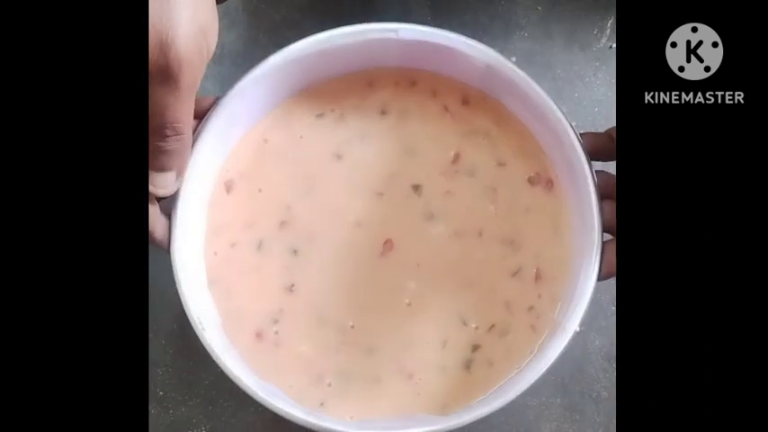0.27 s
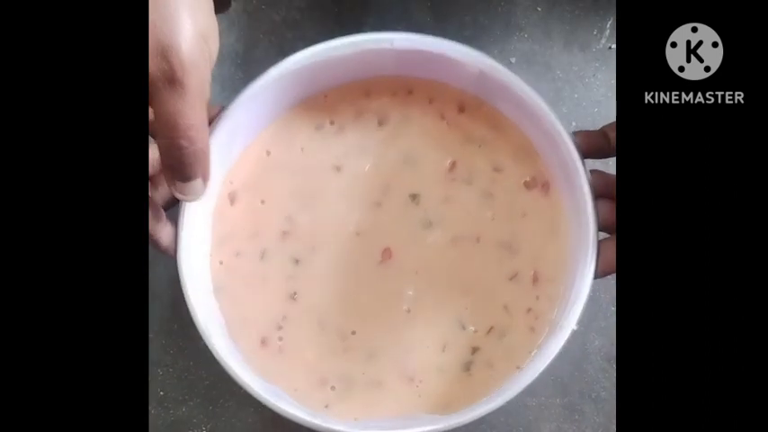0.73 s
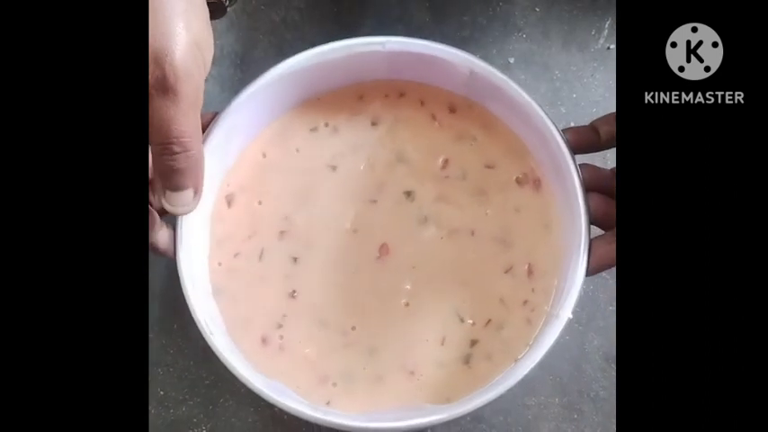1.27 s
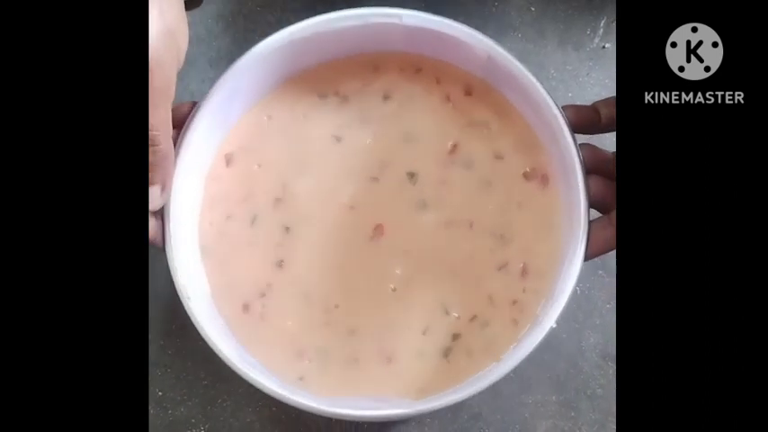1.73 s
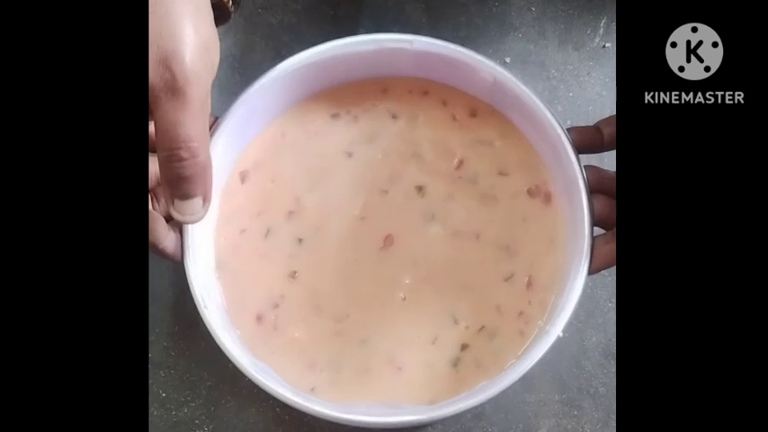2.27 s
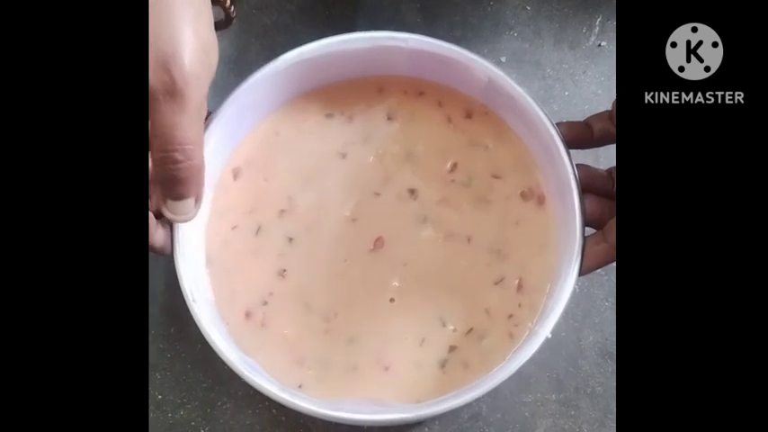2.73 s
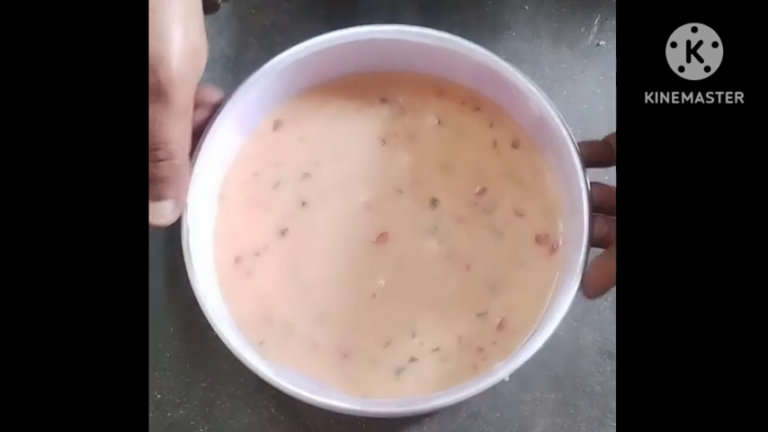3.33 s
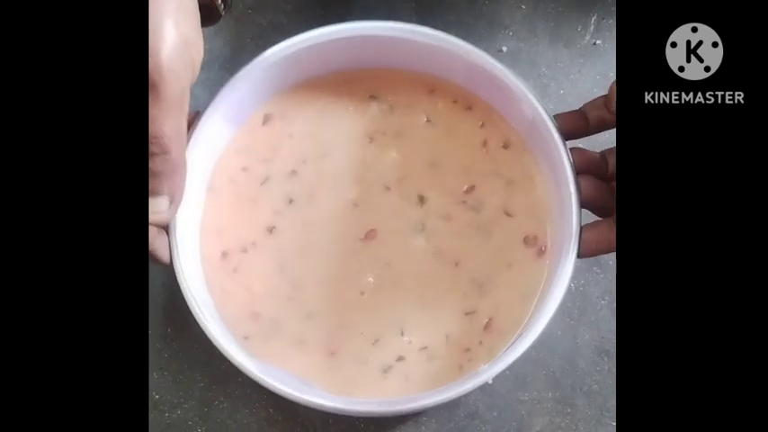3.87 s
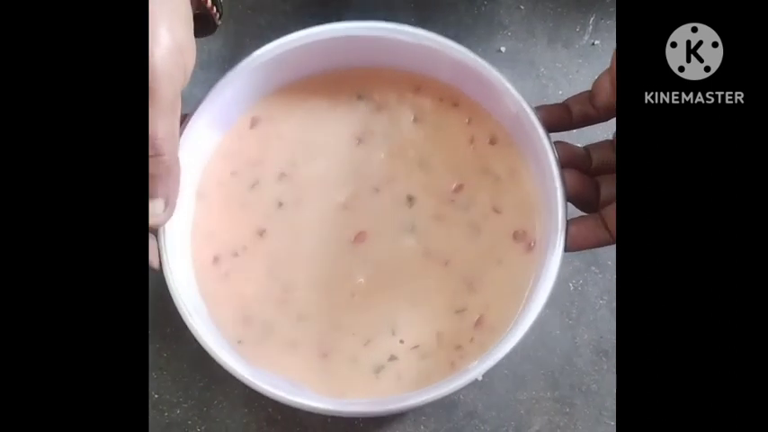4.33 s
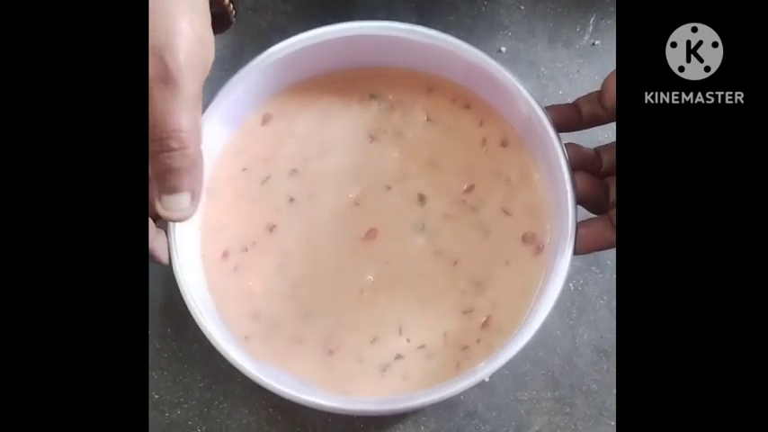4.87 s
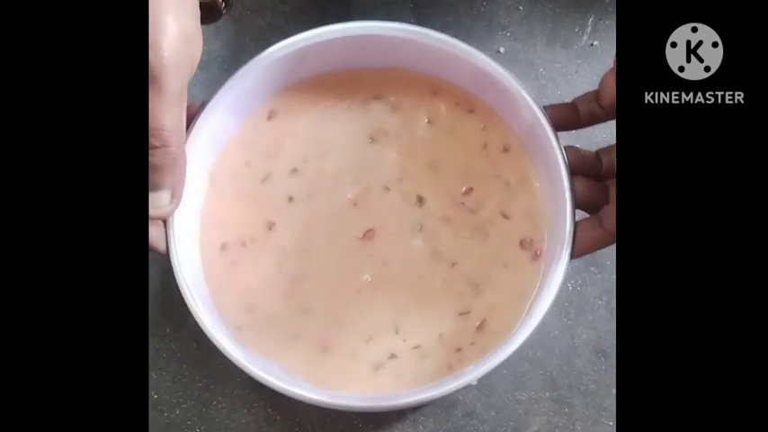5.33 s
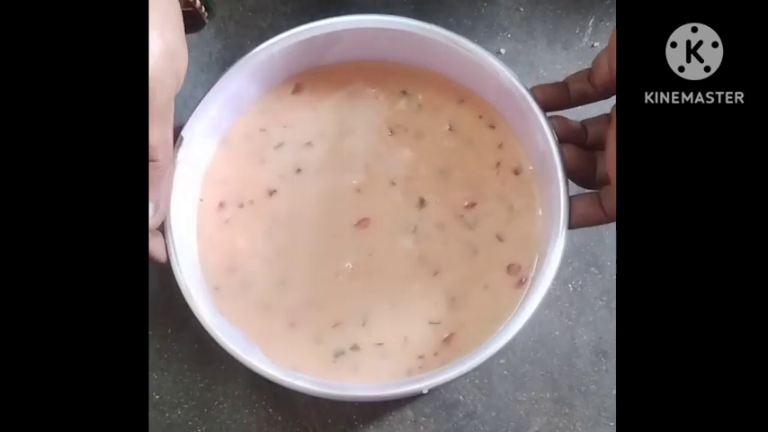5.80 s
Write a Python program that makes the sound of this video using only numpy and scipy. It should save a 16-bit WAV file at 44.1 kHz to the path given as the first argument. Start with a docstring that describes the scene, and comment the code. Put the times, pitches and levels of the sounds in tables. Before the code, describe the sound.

In a quiet, bare kitchen, a batter-filled metal tin hits a stone counter over and over, close to the microphone. It lands tilted, so each knock is a tight, dull double clack with a rim click and a short ring from the room. The knocks start loosely spaced, speed up to about four a second past the middle, and end with two slower ones. Fingers faintly brush the tin over a soft low hum.

```python
"""A bare kitchen: a round metal cake tin full of batter is knocked on a stone counter, again and again.
It lands tilted: one edge strikes, then the other. The batter deadens the metal to a short clack,
the rim clicks on the stone, the base hums briefly and the room rings on. Fingers brush the tin.
Behind it lie quiet air and a low hum; a faint whine fades under the first knocks, and a faint
drone and hiss come and go."""
import sys
import numpy as np
from scipy import signal
from scipy.fft import rfft, irfft, next_fast_len
from scipy.io import wavfile

SR = 44100
rng = np.random.default_rng(int(sys.argv[2]) if len(sys.argv) > 2 else 0)


def wav_record(signal):
    """Record a signal, one row per channel, as 16-bit PCM in the file named by sys.argv[1]."""
    frames = np.transpose(np.atleast_2d(signal))
    bounded = np.clip(frames, -1, 1)
    # unit amplitude maps onto the largest positive 16-bit level
    quanta = np.round(bounded * 32767).astype(np.int16)
    wavfile.write(sys.argv[1], SR, quanta)


N = 268172
TIME_S = np.arange(N) / SR
HZ = np.fft.rfftfreq(SR, 1 / SR)


def amp(db):
    """Decibels to gain."""
    return 10 ** (np.asarray(db) / 20)


def unit_rms(x):
    """x at rms 1."""
    return x / np.sqrt(np.mean(x ** 2) + 1e-20)


def curve(points, hz):
    """Interpolate (freq_hz, value) rows on a log axis."""
    freq_hz, values = np.transpose(points)
    return np.interp(np.log(hz + 1), np.log(freq_hz + 1), values)


def filtered(x, response):
    """x through a frequency response."""
    size = next_fast_len(N + SR // 2)
    return irfft(rfft(x, size) * response(np.fft.rfftfreq(size, 1 / SR)), size)[..., :N]


def resonance(hz, centre_hz, width_hz):
    """Causal resonator, gain 1 at centre."""
    return 1j * hz * width_hz / (centre_hz ** 2 - hz ** 2 + 1j * hz * width_hz)


def noise(response):
    """Shaped stereo noise, rms 1."""
    return unit_rms(filtered(rng.standard_normal((2, N)), response))


def band_noise(centre_hz, width_hz):
    """Narrow stereo noise, rms 1."""
    return noise(lambda hz: resonance(hz, centre_hz, width_hz) ** 2)


def swells(rows):
    """Envelope of one Gaussian bell per row."""
    return sum(amp(db) * np.exp(-((TIME_S - peak_s) / half_s) ** 2) for peak_s, db, half_s in rows)


# Air spectrum: freq_hz, relative_db
AIR_SPECTRUM = [(18, -63), (30, -25), (127, 2.5), (404, -10), (486, -3.5), (1040, -16), (1280, -19),
                (2120, -23), (2480, -25.5), (3310, -28), (4650, -33), (11100, -35.5), (16000, -48)]
def room_air(level_db=-66):
    """Quiet air, largely common to left and right."""
    air = noise(lambda hz: amp(curve(AIR_SPECTRUM, hz)))
    return amp(level_db) * unit_rms(air + air[::-1] / 2)


def hum(level_db=-71):
    """Low mono hum."""
    return amp(level_db) * band_noise(centre_hz=113.4, width_hz=8.1)[0]


# Whine partials: centre_hz, level_db
WHINE_PARTIALS = [(624, -72), (1276, -77.5), (3348, -82.5), (3763, -85.5), (4177, -86.5)]
def whine(hold_s=0.93, fade_db_per_s=10):
    """Faint high whine: holds, then dies away."""
    fade = amp(-fade_db_per_s * np.maximum(TIME_S - hold_s, 0))
    return fade * sum(amp(db) * band_noise(hz, width_hz=28) for hz, db in WHINE_PARTIALS)


# Tin landings: start_s, near_db, near_click_db, thud_db, hardness_db, rock_s,
# far_db, far_click_db, base_hum_db
LANDINGS = [(0.3758, -12, -21, 0.5, 6.5, 0.014, -15.5, -32.5, -57),
            (.780, -13.5, -26.5, 2.5, 4.5, 0.013, -11.5, -27, -65.5),
            (1.105, -15.5, -41, 3, -36, 0.0062, -15.5, -32.5, -65),
            (1.8442, -14, -34.5, 3, -2.5, .0176, -11.5, -27, -60),
            (2.2044, -11.5, -26, -0.5, -0.5, .018, -11, -33, -65),
            (2.4973, -16.5, -27.5, 9.5, 5.5, 0.016, -26, -30, -41.5),
            (2.751, -19.5, -35.5, 10.5, -3.5, 0.0032, -16, -28, -46.5),
            (3.2567, -28, -39, 5, 4, 0.044, -10.5, -30.5, -53),
            (3.7727, -20.5, -28, 9.5, 7, 0.012, -14, -28, -46.5),
            (4.0244, -11.5, -23.5, 6.5, 1, .0101, -12.5, -28, -41.5),
            (4.302, -10, -35.5, 0.5, -0.5, .016, -15, -32.5, -45),
            (4.5589, -9.5, -28.5, 4.5, 0.5, .0145, -11.5, -32.5, -47.5),
            (4.794, -14, -24.5, 6, 10, 0.0099, -12, -33, -49.5),
            (5.031, -10.5, -18.5, 3, 2.5, 0.0088, -9.5, -35.5, -40.5),
            (5.5365, -12, -31.5, 8, 3, 0.0045, -11.5, -31.5, -51),
            (6.035, -17, -40, 11.5, 4.5, 0.0051, -15, -25, -59)]
def contacts(graze_lead_s=0.0036, graze_db=-12.5, bounce_lag_s=0.018, bounce_db=-13):
    """Four contacts per landing: near edge, graze of the rolling rim, far edge, last bounce."""
    rows = []
    for start_s, near_db, click_db, thud_db, hardness_db, rock_s, far_db, far_click_db, _ in LANDINGS:
        # The far edge brings down more batter and lands softer.
        far_tone = (far_click_db, thud_db + 0.5, hardness_db - 4.5)
        lead_s, lag_s = np.array([graze_lead_s, bounce_lag_s]) * rng.uniform(0.75, 1.25, 2)
        rows += [(start_s, near_db, click_db, thud_db, hardness_db),
                 (start_s + max(rock_s - lead_s, rock_s / 2), far_db + graze_db, *far_tone),
                 (start_s + rock_s, far_db, *far_tone),
                 (start_s + rock_s + lag_s, far_db + bounce_db, *far_tone)]
    return rows


# Resonances of the filled tin: centre_hz, width_hz, gain_db
TIN_MODES = [(138, 166, 5), (266, 92, 19), (500, 180, 19.5), (855.5, 291, 27), (1120, 462, 26.5),
             (1411, 500, 22.5), (1998, 251, 20.5), (2640, 390, 16.5)]
def tin_modes(contact_hz=2200):
    """One spectrum per batter-damped mode, driven by a low-passed push."""
    push = 1 / (1 + 1j * np.sqrt(2) * HZ / contact_hz - (HZ / contact_hz) ** 2)
    return np.array([(-1) ** k * amp(db) * push * resonance(HZ, centre_hz, width_hz)
                     for k, (centre_hz, width_hz, db) in enumerate(TIN_MODES)])


def jolt(centre_hz=1300, width_hz=1400, gain_db=19, delay_s=0.00039):
    """Spectrum of the push of air as the tin stops dead, just after contact."""
    pulse = amp(gain_db) * resonance(HZ, centre_hz, width_hz) ** 2
    delay = np.exp(-2j * np.pi * HZ * delay_s)
    return pulse * delay / (1 + (HZ / (2 * centre_hz)) ** 8)


def grit(rise_s=0.00055):
    """Spectrum of the rim grating briefly on stone."""
    age = np.arange(SR // 100) / SR / rise_s
    burst = rng.standard_normal(len(age)) * age * np.exp(-age)
    return rfft(burst / np.linalg.norm(burst), SR)


# Rim click spectrum: freq_hz, gain_db
RIM_SPECTRUM = [(1500, 0), (3000, 24), (4000, 23), (5200, 22), (7000, 24.5), (8500, 22), (11000, 19),
                (14500, 14), (16000, 8.5)]
def knocks(shelf_hz=1400, mix_spread_db=1.5, room_share=0.28, room_count=5):
    """Each contact sends a clack and a rim click out directly and through the room."""
    margin = SR // 10
    out = np.zeros((2, N + 2 * SR))
    blows, modes, air_push = contacts(), tin_modes(), jolt()
    # Each point of the edge drives its own mix of modes.
    mixes = amp(mix_spread_db * rng.standard_normal((len(blows), len(modes))))
    rim = amp(curve(RIM_SPECTRUM, HZ))
    thud = resonance(HZ, centre_hz=190, width_hz=300)
    from_base, from_rim = direct_path(left_lead_s=0.00007), direct_path(left_lead_s=0)
    # The landing spot changes, and part of the room response with it.
    steady_room = standing_waves() + np.sqrt(room_share) * reverberation()
    rooms = [steady_room + np.sqrt(1 - room_share) * reverberation() for _ in range(room_count)]
    for k, (start_s, level_db, click_db, thud_db, hardness_db) in enumerate(blows):
        # Cushioning fingers take off treble.
        hardness = ((shelf_hz + 1j * HZ * amp(hardness_db / 2)) / (shelf_hz + 1j * HZ)) ** 2
        # A flat landing puts the batter's weight into the counter.
        weight = 1 + (amp(thud_db) - 1) * thud
        body = (mixes[k][:, None] * modes).sum(axis=0) * weight
        reflections = scatter() + rooms[k % room_count]
        clack = hardness * (body * (from_base + reflections) + air_push * from_base)
        click = amp(click_db) * rim * (grit() * from_rim + reflections)
        blow = np.roll(irfft(clack + click, SR), margin, axis=1)
        out[:, round(start_s * SR):][:, :SR] += amp(level_db) * blow
    return out[:, margin:margin + N]


# Direct sound balance: freq_hz, left_boost_right_cut_db
DIRECT_BALANCE = [(200, 0), (600, 0), (1200, 3.2), (2200, -.3), (4000, -2.4), (8000, -4.2), (15000, -3.6)]
def direct_path(left_lead_s):
    """Stereo response of the straight path: level and time offset between sides."""
    sides = np.array([[1], [-1]])
    return amp(sides * curve(DIRECT_BALANCE, HZ)) * np.exp(1j * np.pi * HZ * left_lead_s * sides)


# Diffuse field: freq_hz, left_right_coherence
COHERENCE = [(100, 0.99), (280, 0.93), (520, 0.69), (900, 0), (2000, 0), (10000, 0)]
def diffuse(pair):
    """Two spectra mixed to stereo: alike in the bass, unrelated above."""
    angle = np.arccos(np.clip(curve(COHERENCE, HZ), -1, 1)) / 2
    mid, side = pair[0] * np.cos(angle), pair[1] * np.sin(angle)
    return np.array([mid + side, mid - side])


def scatter(rise_s=0.0013, gain_db=-4):
    """Early response: the blow runs round the tin's wall and bounces off the counter."""
    age = np.arange(SR // 40) / SR / rise_s
    burst = rng.standard_normal((2, len(age))) * age * np.exp(-age)
    return amp(gain_db) * diffuse(rfft(burst / np.linalg.norm(burst[0]), SR))


# Reverberation colour: freq_hz, gain_db
REVERB_SPECTRUM = [(40, -4), (100, 6), (250, -1), (370, 0.5), (550, 7.5), (800, 4), (1300, 0.5), (2000, -1),
                   (3000, -5.5), (4500, -5), (8000, -2.5), (15000, -0.5)]
# Reverberation decay: freq_hz, t60_s
REVERB_DECAY = [(100, 0.7), (350, 0.46), (560, 0.44), (1000, 0.36), (2500, 0.47), (6000, 0.32),
                (15000, 0.26)]
def reverberation(build_s=0.002):
    """Response of the bare walls: fast build-up, each frequency dying at its own rate."""
    hz, frame_s, frames = signal.stft(rng.standard_normal((2, SR)), SR, nperseg=256)
    decay = amp(-60 * frame_s / curve(REVERB_DECAY, hz)[:, None])
    tail = signal.istft(frames * decay, SR, nperseg=256)[1][:, :SR]
    tail *= 1 - np.exp(-np.arange(SR) / SR / build_s)
    return diffuse(rfft(tail / np.linalg.norm(tail[0]))) * amp(curve(REVERB_SPECTRUM, HZ))


# Kitchen modes: pitch_hz, gain_db, t60_s
ROOM_MODES = [(76.8, -46.5, 0.89), (119, -55, 0.85), (139, -53.5, 1), (196, -54, 0.24),
              (214.1, -54.5, 0.59), (245, -50, 0.44), (270.6, -51, 0.15), (331.3, -52, 0.13),
              (432.3, -45.5, 0.38), (489.8, -44, 0.36), (517, -47.5, 0.46), (547.6, -47, 0.49),
              (579, -54, 0.51), (613.5, -46.5, 0.4), (683, -48.5, 0.17), (787, -53, 0.27),
              (798, -48.5, 0.26), (889, -53, 0.35), (953, -50, 0.28), (1018, -57, 0.48), (1164, -52, 0.31),
              (1413, -51, 0.38), (1650, -48.5, 0.44)]
def standing_waves(build_s=0.004):
    """Response of the room's strongest modes: they swell, then ring on."""
    t = np.arange(SR) / SR
    phases = rng.uniform(0, 2 * np.pi, (len(ROOM_MODES), 2, 1))
    ring = sum(amp(db - 60 * t / t60_s) * np.sin(2 * np.pi * hz * t + phase)
               for (hz, db, t60_s), phase in zip(ROOM_MODES, phases))
    return diffuse(rfft(ring * (1 - np.exp(-t / build_s))))


def base_hum(pitch_hz=136, sag_per_s=0.09, t60_s=3.9, swell_s=0.055, rest_s=0.15, release_s=0.015):
    """With both edges down the batter-laden base rings low and sags in pitch; lifting stops it."""
    out, t = np.zeros(N + SR), np.arange(SR // 2) / SR
    swell = 1 - np.exp(-t / swell_s)
    lift = np.exp(-np.maximum(t - rest_s, 0) / release_s)
    for start_s, *_, rock_s, _, _, level_db in LANDINGS:
        hz = pitch_hz * (1 + rng.normal(0, 0.011)) * (1 - sag_per_s * t)
        ring = amp(level_db - 60 * t / t60_s) * np.sin(2 * np.pi * np.cumsum(hz) / SR)
        out[round((start_s + rock_s) * SR):][:len(t)] += swell * lift * ring
    return out[:N]


# Finger touches: peak_s, level_db, rise_and_decay_s
FINGER_TOUCHES = [(1.397, -76, 0.091), (1.714, -70, 0.0052), (2.849, -67, 0.0071), (3.536, -77.5, 0.054),
                  (4.906, -66, 0.0087), (5.147, -64, 0.00507)]
def fingers():
    """Fingers shift on the tin's wall with small dry rustles."""
    pressure = sum(amp(db) * np.exp(-np.abs(TIME_S - peak_s) / decay_s)
                   for peak_s, db, decay_s in FINGER_TOUCHES)
    return pressure * noise(lambda hz: amp(curve(RIM_SPECTRUM, hz)))


# Drone swells: peak_s, level_db, half_width_s
DRONE_SWELLS = [(1.6, -68, 0.38), (3.6, -67.5, 0.195)]
def drone():
    """Faint midrange tone that swells twice."""
    return swells(DRONE_SWELLS) * band_noise(centre_hz=472, width_hz=22)


# Hiss swells: peak_s, level_db, half_width_s
HISS_SWELLS = [(1.6, -74, 0.19), (2.15, -70, 0.08), (2.9, -77, .35)]
def hiss():
    """Faint narrow hiss that comes and goes."""
    return swells(HISS_SWELLS) * band_noise(centre_hz=2120, width_hz=260)


def scene():
    """The knocked tin in the quiet kitchen."""
    tin = knocks() + base_hum() + fingers()
    return tin + room_air() + hum() + whine() + hiss() + drone()


def record(dry):
    """Steep low-pass at the band limit."""
    cutoff_hz = 15700
    return filtered(dry, lambda hz: 1 / np.sqrt(1 + (hz / cutoff_hz) ** 120))


dry = scene()
out = record(dry)
wav_record(out)
```